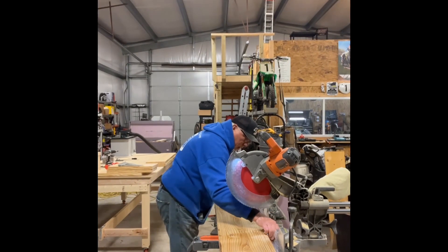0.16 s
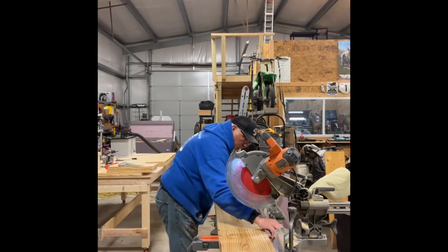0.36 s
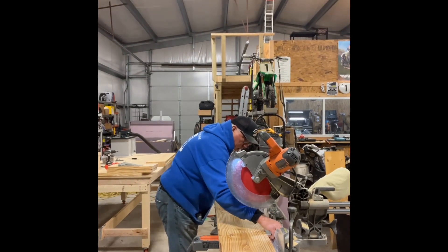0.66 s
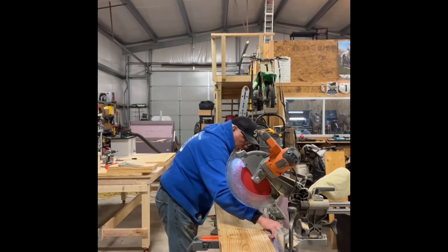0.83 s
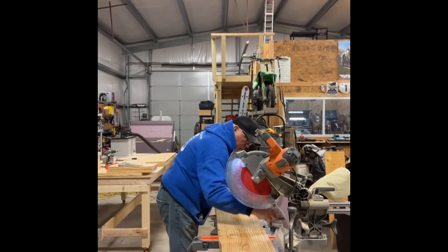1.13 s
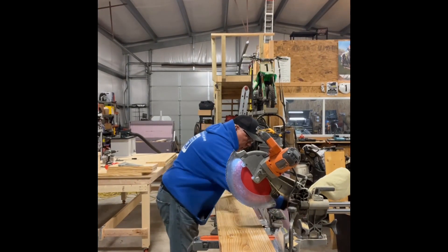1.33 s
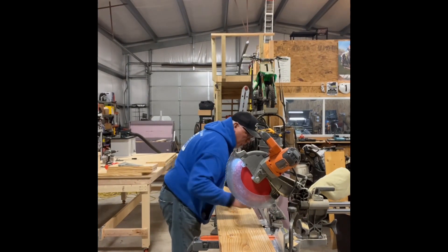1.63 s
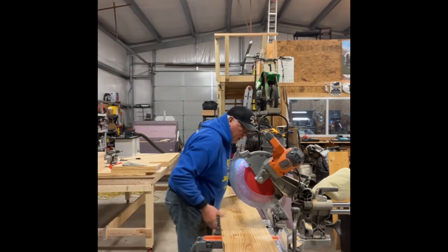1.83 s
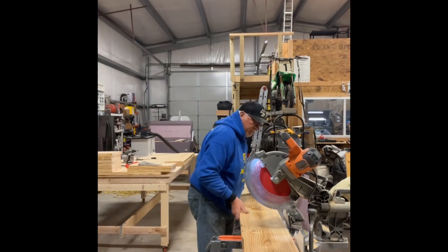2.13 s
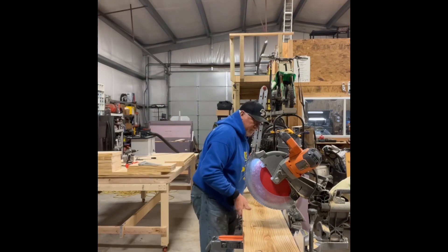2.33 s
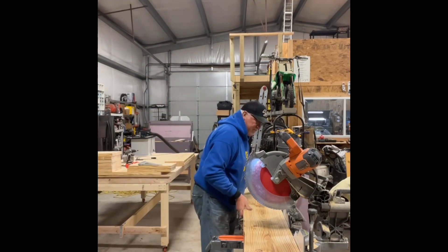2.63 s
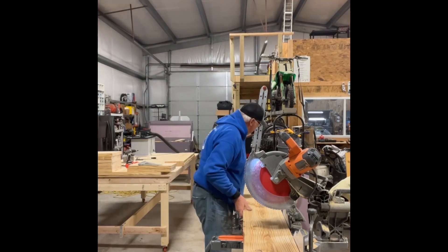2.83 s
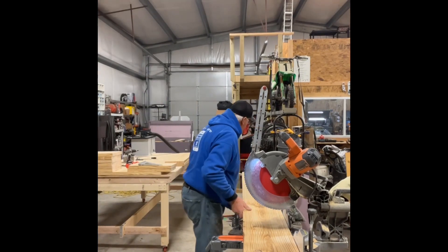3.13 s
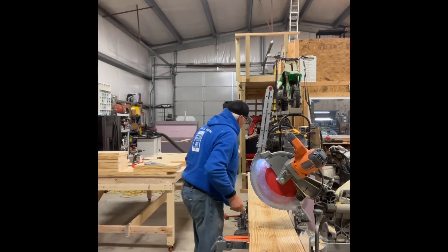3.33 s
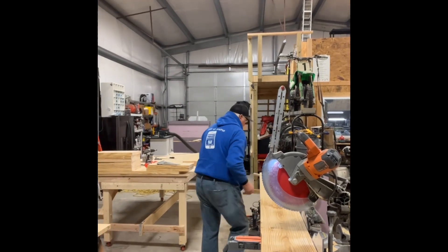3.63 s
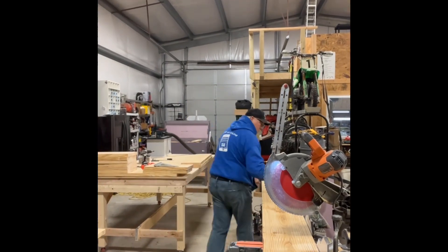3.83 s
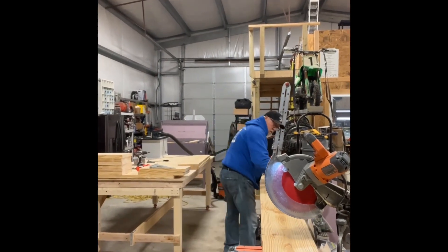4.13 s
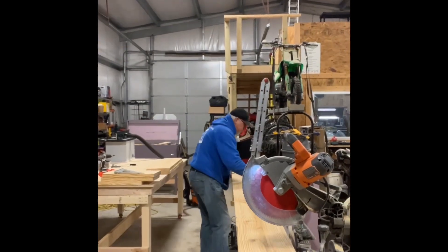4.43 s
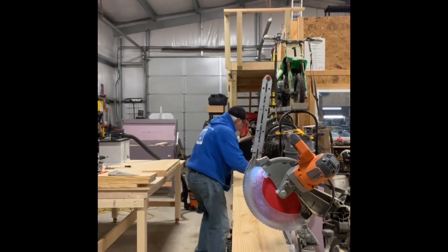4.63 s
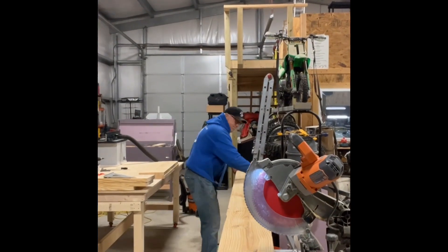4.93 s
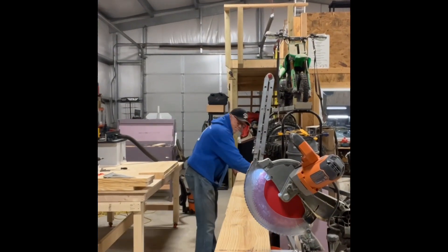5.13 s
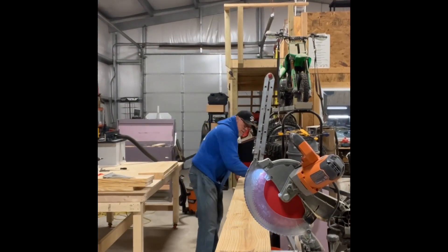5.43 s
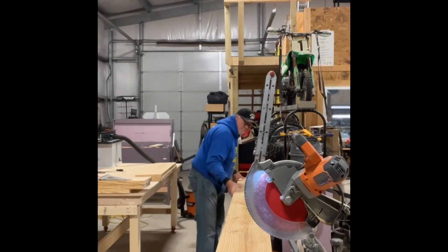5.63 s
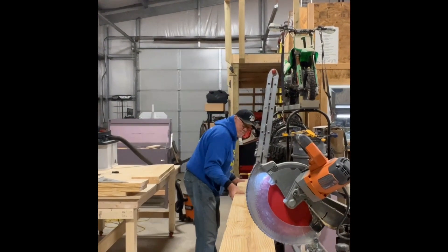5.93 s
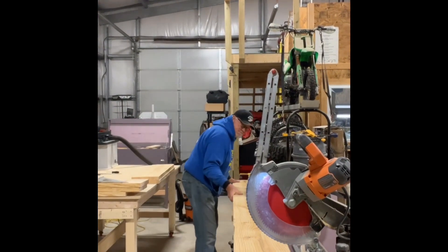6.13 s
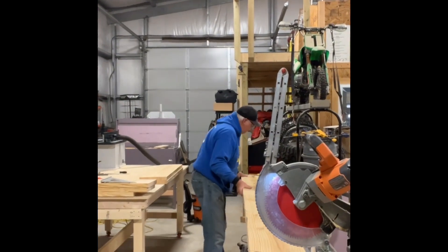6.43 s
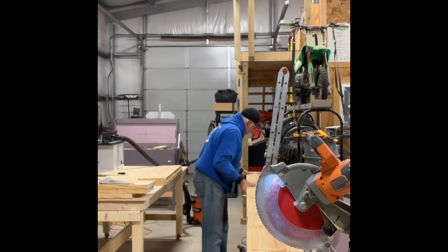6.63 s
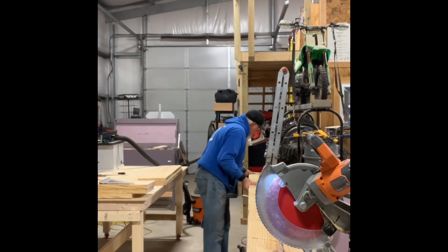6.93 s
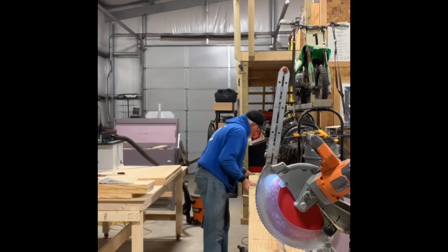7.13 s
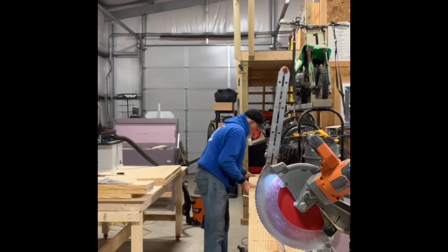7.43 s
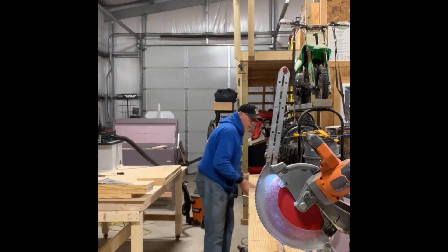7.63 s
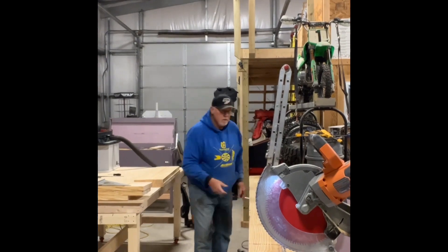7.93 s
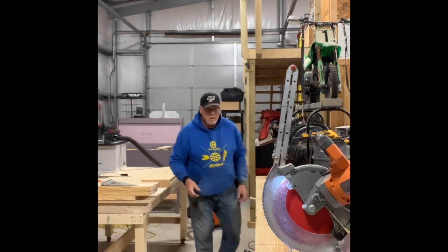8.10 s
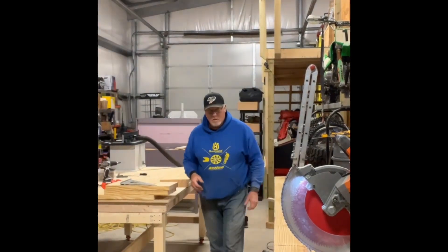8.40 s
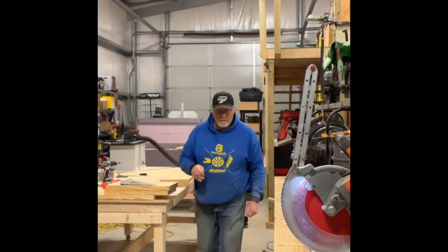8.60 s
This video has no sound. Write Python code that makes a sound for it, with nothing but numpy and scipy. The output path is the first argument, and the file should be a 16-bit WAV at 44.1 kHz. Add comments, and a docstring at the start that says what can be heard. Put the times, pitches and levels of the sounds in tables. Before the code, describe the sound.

A long wooden board is knocked, shoved and slid along a bench in a workshop, over a faint fan hum.

```python
"""Wooden board on a saw bench

A long board is knocked about in a large workshop, each blow a snap that sets the wood ringing.
Shoved along, it sticks and slips in a judder; it slides on grit with a thin squeal and bumps home.
A few faint low thuds sound like footsteps. Sleeves rustle, small things tick under the fingers,
and a distant fan hums in the air of the hall."""
import sys
import numpy as np
from scipy import signal
from scipy.fft import rfft, irfft, next_fast_len
from scipy.io import wavfile
from scipy.ndimage import uniform_filter1d

SR = 44100
rng = np.random.default_rng(int(sys.argv[2]) if len(sys.argv) > 2 else 0)


def wav_out(sig):
    """Save sig, one row per channel (or a flat mono array), as 16-bit PCM at SR to the path in sys.argv[1]."""
    wavfile.write(sys.argv[1], SR, np.round(np.clip(np.atleast_2d(sig).T, -1, 1) * 32767).astype(np.int16))


N = 386316
TIME = np.arange(N) / SR
MIDDLE_HZ = 1370  # the board's middle contact pitch


def knocks(level_db=-3.5, ring_db=-5.5, snap_s=0.0013, free_ring_s=0.26, bench_hz=132.2, bench_s=0.087):
    """Each hit is a snap, a burst of short-lived modes and a wooden ring, coloured by the contact."""
    # wooden knocks, and a few faint low thuds like footsteps: start_s, level_db,
    # hardness_db (treble over middle), pitch_hz, t60_s, rise_s (time to full contact),
    # hollow_db (how far the contact pitch stands out)
    hits = [(1.5136, -25, -3, 2160, 0.078, 0.00014, -1.5), (1.57, -34, 5, 2300, 0.05, 0.00025, -13),
            (1.579, -27, -7.5, 2600, 0.14, .0005, 0), (1.623, -22.5, -9, 2360, 0.079, 0.00012, -5.5),
            (1.961, -50, -2, 720, 0.14, 0.00089, -1), (2.002, -45.5, -9, 1490, .14, .0014, -11),
            (2.11, -15.5, -20.5, 1700, 0.078, 0.00024, -0.5), (2.662, -46.5, -15, 1400, 0.053, 0.0036, 8.5),
            (3.477, -62, -15.5, 754, .044, 0.00029, -3.5), (3.832, -56.5, -7.5, 965, 0.056, .002, 1),
            (3.978, -57, -12, 800, 0.14, .0026, 0), (4.028, -46.5, -11.5, 1385, 0.45, .002, -6),
            (4.183, -19.5, -5.5, 1780, 0.055, 0.0026, 14.5), (4.342, -30, -3, 1350, 0.088, .014, 0),
            (4.441, -39, -0.5, 1070, 0.099, 0.00023, -29), (4.502, -28.5, -5, 1420, 0.45, 0.0054, -24),
            (4.525, -9.5, -9, 1595, 0.16, 0.00018, -6.5), (4.769, -37.5, -12, 1380, 0.1, 0.0088, -13),
            (5.001, -35.5, 2, 1360, .06, 0.00025, -11), (5.044, -37, -1, 1690, 0.033, 0.0017, -23),
            (5.111, -45, 1, 2050, 0.046, 0.00055, -12), (5.15, -50.5, 0.5, 2470, 0.034, .0003, -8),
            (5.293, -30, -14.5, 1167, 0.15, 0.0022, -21.5), (5.495, -52.5, -8, 1163, 0.22, 0.016, -9),
            (5.934, -40, -15, 1180, 0.16, 0.0023, -7), (6.669, -15.5, -12, 1400, 0.17, 0.00062, -15),
            (6.87, -29, -16.5, 1020, 0.18, 0.0022, -9.5), (7.065, -21, -20, 1370, 0.18, 0.00071, -5.5),
            (7.073, -23.5, -27, 1050, 0.12, 0.00024, -9.5), (7.115, -35, -6.5, 1280, 0.27, 0.0017, -32),
            (7.162, -35.5, -10.5, 1320, 0.083, .0028, -1), (7.262, -38.5, -26, 1103, 0.064, 0.00097, 4.5),
            (7.421, -56.5, -12, 1262, .08, 0.0035, -3)]
    # bands of the thud, clack, crack and fizz: low_hz, high_hz
    bands = [(170, 660), (750, 3200), (3100, 7000), (7000, 16000)]
    out, t = np.zeros(N), np.arange(SR // 4) / SR
    for start_s, hit_db, hardness_db, pitch_hz, t60_s, rise_s, hollow_db in hits:
        # a lower contact thuds more; a harder hit is shorter and thuds less for its level
        thud_db = -12.5 - 10.5 * np.log2(pitch_hz / MIDDLE_HZ) - 0.21 * (hit_db + 35)
        fizz_db = -4 + 1.1 * hardness_db
        band_levels = hit_db + np.array([thud_db, 0, hardness_db, fizz_db])
        snap = 1 + np.exp(-t / snap_s)
        burst = rng.choice([-1., 1.], len(t)) * amp(-60 * t / t60_s) * snap
        ring = board_ring(t, damping=max(free_ring_s / t60_s, 1))
        wood = burst / np.linalg.norm(burst) + amp(ring_db) * ring
        wood *= 1 - np.exp(-t / rise_s)  # a flat face lands gradually
        contact = filtered(wood, 2, pitch_hz * np.exp([-.315, .315]), "band")
        clack = unit(wood) + amp(hollow_db) * unit(contact)
        clack = filtered(clack, 2, 0.23 * pitch_hz, "high")  # a small contact misses the low modes
        fizz = filtered(wood, 1, 7000, "low")  # wood soaks up the top treble
        thud = filtered(wood, 1, 300, "high")  # a narrow board radiates little bass
        for band, band_db, drive in zip(bands, band_levels, (thud, clack, wood, fizz)):
            layer = filtered(drive, 4, band, "band")
            attack_rms = np.std(layer[:SR // 40])
            add(out, start_s, amp(band_db + level_db) * layer / attack_rms)
        # the bench takes the weight with one low note and a dull push
        bench = np.sin(2 * np.pi * bench_hz * t) * np.exp(-t / bench_s) * (1 - np.exp(-t * bench_hz))
        push = unit(filtered(burst, 2, 70, "low"))
        add(out, start_s, amp(hit_db + thud_db - 22) * bench + amp(hit_db - 64.5) * push)
    return out


def board_ring(t, damping=1.):
    """The board rings; each point of contact favours other modes, and a firm hold damps them."""
    # modes of the board on its bench: pitch_hz, level_db, t60_s
    modes = [(226, -16, 0.058), (255, -14, 0.19), (377, -9.5, 0.13), (466, -6, 0.076), (630, -4, 0.11),
             (708, -3, 0.077), (794.5, -3, 0.18), (977, -1.5, .16), (1141.8, 1, 0.1), (1210, -7.5, 0.011),
             (1254, -5.5, 0.21), (1456, -4.5, 0.084), (1539, -1.5, 0.11), (1694, -1, 0.03),
             (1790, -0.5, 0.094), (1997, -5, 0.16), (2123, 2, 0.049), (2330, -12, 0.16), (2560, -5.5, 0.3),
             (2747, -7, .13), (3057, -10, 0.12), (4174, -10.5, .08), (4920, -10, 0.08), (5100, -1.5, 0.21),
             (5470, -4, 0.11)]
    hz, db, t60_s = np.transpose(modes)[:, :, None]
    favour_db, phase = rng.uniform(-2, 2, hz.shape), rng.random(hz.shape)
    envelopes = amp(db + favour_db - 60 * t * damping / t60_s)
    ring = (envelopes * np.sin(2 * np.pi * (hz * t + phase))).sum(0)
    return ring / np.linalg.norm(ring)


def through_board(force, ring_db):
    """Contact forces heard directly and through the ringing wood."""
    return force + amp(ring_db) * signal.oaconvolve(force, board_ring(np.arange(SR // 4) / SR))[:N]


def judder(level_db=-3.0, uneven_db=2.5, scrape_db=1.5, rasp_db=-4.5):
    """The board sticks and slips: a train of sharp, rasping jolts, each trailing a little scrape."""
    # the hard shove: time_s, slip_rate_hz, level_db
    shove = [(4.09, 230, -39), (4.104, 230, -20), (4.13, 215.5, -14), (4.15, 209.5, -18.5),
             (4.18, 205.8, -12), (4.2, 229, -28), (4.25, 225.5, -35.5)]
    # tone colour of the slips: frequency_hz, level_db
    slip_eq = [(60, -35.5), (140, -11.5), (215, 1.5), (450, -8), (800, -6.5), (1300, 1), (2100, 0),
               (3400, -3.5), (5200, 1), (6800, -9), (9000, -7), (15000, -12.5)]
    rate_hz, db = curves(shove)
    cycles = np.cumsum(rate_hz * (1 + .008 * wander(200))) / SR
    slips = np.diff(np.floor(cycles), prepend=0) * amp(uneven_db * wander(270))
    t = np.arange(SR // 250) / SR
    # bending waves carry the treble ahead of the bass
    bending_wave = signal.chirp(t, 16000, t[-1], 300, "logarithmic") * np.exp(-2 * t / t[-1])
    slips = unit(signal.oaconvolve(slips, bending_wave)[:N])
    scrape = filtered(rng.standard_normal(N) * np.exp(-(cycles % 1) / .4), 2, 2800, "high")
    force = slips + amp(scrape_db) * unit(mottle(scrape))
    wood = colour(through_board(force, ring_db=-8.5), slip_eq)
    rasp = unit(resonate(wood, hz=1900, width_hz=700))
    return amp(db + level_db) * gate(shove) * unit(wood + amp(rasp_db) * rasp)


def slides(rub_trim_db=-2.0, grit_trim_db=-4.5, chatter_db=1.5, groan_even_db=-38.0):
    """Fibres and grit catch under the moving board; it rings, and groans more the harder it rubs."""
    # tone colours of rubbing wood and of grit: frequency_hz, level_db
    rub_eq = [(60, -38), (150, -8.5), (400, -10), (700, -6), (920, -5.5), (1150, -3.5), (1800, -2.5),
              (2600, -6.5), (3600, -20), (8000, -37.5)]
    grit_eq = [(500, -42), (2000, -19.5), (3200, 1.5), (5000, 1.5), (7000, 0), (11000, -1), (16000, -7)]
    rub_db, grit_db, groan_hz = pushes()
    catches = grains(per_s=5000, spread_db=1.5) * amp(chatter_db * wander(86))
    wood = colour(through_board(catches, ring_db=-5.5), rub_eq)
    groan = resonate(resonate(wood, groan_hz, 280), groan_hz, 600)
    groan /= np.sqrt(uniform_filter1d(groan ** 2, size=SR // 20) + 1e-12)  # as strong at every pitch
    groan_share = amp(np.clip(.7 * (rub_db - groan_even_db), -6, 6))
    rub = (wood + groan_share * groan) / np.hypot(1, groan_share)
    grit = colour(mottle(catches), grit_eq)
    return amp(rub_db + rub_trim_db) * rub + amp(grit_db + grit_trim_db) * grit


def pushes(rub_power=.9, grit_power=1.6):
    """Rub and grit levels grow with the board's speed; the louder push leads the groan's pitch."""
    # pushes along the bench: start_s, rise_s, fall_s, rub_db, grit_db, groan_from_hz, groan_to_hz
    moves = [(1.991, 0.22, 0.19, -42, -49, 1835, 1414), (2.33, 0.048, 0.15, -51, -62, 690, 417),
             (4.17, 0.081, 0.096, -45, -54, 1700, 1080), (4.29, 0.15, 0.14, -40, -34.5, 1390, 930),
             (4.772, 0.23, 0.036, -34, -37.5, 1000, 1210), (4.95, 0.052, 0.19, -52.5, -37.5, 1230, 1150),
             (5.919, 0.17, 0.13, -48, -45.5, 1300, 1410), (6.17, 0.1, 0.18, -46, -46.5, 1200, 1480),
             (6.40, 0.069, 0.35, -50, -47.5, 1390, 1070)]
    rub, grit, weighted_hz = np.full(N, 1e-9), np.zeros(N), np.full(N, 1e-9 * MIDDLE_HZ)
    for start_s, rise_s, fall_s, rub_db, grit_db, from_hz, to_hz in moves:
        speed = swell(start_s, rise_s, fall_s)
        rubbing = amp(rub_db) * speed ** rub_power
        rub += rubbing
        grit += amp(grit_db) * speed ** grit_power
        weighted_hz += rubbing * np.interp(TIME, [start_s, start_s + rise_s + fall_s], [from_hz, to_hz])
    return 20 * np.log10(rub), 20 * np.log10(grit + 1e-9), weighted_hz / rub


def squeal(level_db=-0.5, overtone_db_per_octave=-11.5, rasp_db=-11.5):
    """Fine ridges zip over an edge: a broken, raspy tone that glides up and back down."""
    # the last slide's squeal, rising and sinking with the board's speed: time_s, pitch_hz, level_db
    glide = [(5.99, 1150, -69), (6.06, 1472, -54.5), (6.19, 1910, -70.5), (6.3, 2265, -48.5),
             (6.44, 2437, -49.5), (6.485, 2220, -43), (6.545, 1580, -42), (6.6, 903, -61)]
    hz, db = curves(glide)
    jitter = 1 + .017 * wander(1100) + .009 * wander(60)
    phase = 2 * np.pi * np.cumsum(hz * jitter) / SR
    tone = np.zeros(N)
    for harmonic in (1, 2, 3):
        rasp = 1 + amp(rasp_db) * wander(900)
        tone += amp(overtone_db_per_octave * np.log2(harmonic)) * np.sin(harmonic * phase) * rasp
    flutter_db = 3 * wander(320) + 3.2 * wander(70)
    return amp(db + level_db + flutter_db) * gate(glide) * unit(tone)


def ticks(level_db=-12.0, rise_s=0.0011, decay_s=0.0074, body_db=11.5):
    """Short dry clicks, duller or brighter, each with a small resonant body."""
    # small things under the fingers: start_s, level_db, brightness_db, pitch_hz
    touches = [(0.0176, -39, -3, 1500), (0.1626, -50.5, 16, 2860), (0.183, -37, -3, 2360),
               (0.2808, -39, -18, 2830), (0.384, -40.5, -4, 2640), (0.404, -38, -20, 2540),
               (0.4267, -44, -20, 2530), (0.518, -33.5, -14, 2660), (0.528, -35, -16, 3170),
               (0.607, -38, -27, 1370), (0.919, -26, -4, 2790), (0.9867, -32.5, -3, 1390),
               (1.886, -42, 7.5, 2520), (3.28, -53.5, 21.5, 3040), (3.8076, -40.5, -6, 2880),
               (8.4834, -39.5, 7, 3900)]
    out, t = np.zeros(N), np.arange(SR // 25) / SR
    for start_s, db, brightness_db, pitch_hz in touches:
        click = rng.standard_normal(len(t)) * np.exp(-t / decay_s) * (1 - np.exp(-t / rise_s))
        click = filtered(click, 2, 1100, "high")
        dull = filtered(click, 1, 6000, "low")
        bright = amp(brightness_db) * (click - dull)
        body = amp(body_db) * resonate(click, pitch_hz, width_hz=383)
        add(out, start_s, amp(db + level_db) * (dull + body + bright))
    return out


def rustle(brush_trim_db=-5.0, sheen_trim_db=-6.0, uneven_db=4.5, rise_share=0.47):
    """Cloth and skin brush in fine dense grains, each stroke swelling and fading unevenly."""
    # strokes of sleeves and hands: start_s, length_s, brush_db, sheen_db
    strokes = [(0, 0.036, -55, -63), (0.15, .11, -63, -70), (0.27, 0.21, -77, -66), (0.48, 0.096, -57, -61),
               (0.77, 0.28, -67.5, -78), (2.42, 0.4, -71.5, -55.5), (2.949, 0.068, -54, -40.5),
               (3.041, 0.06, -58, -44), (3.178, 0.065, -51.5, -53.5), (3.406, 0.12, -67, -56),
               (3.502, 0.076, -65, -55.5), (3.61, 0.073, -73.5, -60.5), (3.786, 0.25, -67.5, -61.5),
               (5.486, 0.18, -58, -62.5), (5.636, 0.34, -72, -69.5), (7.358, 0.12, -63, -61),
               (7.555, 0.35, -64, -56.5), (8.06, 0.094, -71.5, -56.5), (8.189, 0.22, -60, -64),
               (8.499, 0.65, -75.5, -69)]
    # tone colours of the soft brush and its high sheen: frequency_hz, level_db
    brush_eq = [(300, -33), (900, -3), (1600, 0), (2700, -0.5), (5500, -9), (8000, -14.5), (16000, -29)]
    sheen_eq = [(1000, -43), (4000, -5.5), (6500, -6.5), (10000, -2.5), (16000, -8)]
    brush_gain, sheen_gain = np.full(N, amp(-78)), np.full(N, amp(-77.5))  # cloth never lies quite still
    for start_s, length_s, brush_db, sheen_db in strokes:
        stroke = swell(start_s, length_s * rise_share, length_s * (1 - rise_share)) ** 1.03
        brush_gain += amp(brush_db) * stroke
        sheen_gain += amp(sheen_db) * stroke
    threads = colour(mottle(grains(per_s=6000, spread_db=1.6)), brush_eq)
    fuzz = colour(mottle(grains(per_s=9000, spread_db=1.6)), sheen_eq)
    cloth = amp(brush_trim_db) * brush_gain * threads + amp(sheen_trim_db) * sheen_gain * fuzz
    return amp(uneven_db * wander(35)) * cloth


def hall(send, build_s=0.011):
    """Scattered echoes build up quickly, each band dying at its own speed."""
    # decay of the hall: frequency_hz, t60_s
    decay_times = [(150, 0.33), (500, 0.36), (1500, 0.26), (4000, 0.4), (8000, .45), (16000, 0.46)]
    echoes = rng.standard_normal(SR) * (rng.random(SR) < .15)
    hz, t, bands = signal.stft(echoes, SR, nperseg=256)
    bands = bands * amp(-60 * t / value_at(decay_times, hz)[:, None]) * (1 - np.exp(-t / build_s))
    tail = signal.istft(bands, SR, nperseg=256)[1]
    return signal.fftconvolve(send, tail / np.linalg.norm(tail))[:N]


def fan(hum_hz=177.5, waver_hz=0.41, air_swell_db=1.4, hum_swell_db=1.2):
    """A distant fan: a wavering hum in soft moving air."""
    # level rides of the hum and the air: time_s, level_db
    hum_ride = [(0, -69.5), (1.1, -70), (1.45, -61), (2.45, -62.5), (2.95, -87.5), (4.4, -61), (5.7, -69),
                (7.1, -62.5), (8.76, -72)]
    air_ride = [(0, -69.5), (1.6, -66), (2.9, -68.5), (4.5, -65), (7.0, -67.5), (8.76, -66)]
    # tone colour of the air: frequency_hz, level_db
    air_eq = [(15, -61.5), (25, -37.5), (43, -33), (102, -1), (161, 0.5), (293, -5.5), (439, -11.5),
              (575, -6), (641, -10.5), (1100, -11), (1440, -9.5), (2350, -13), (3340, -26), (12900, -33.5),
              (16000, -29.5)]
    hum_db, air_db = curves(hum_ride)[0], curves(air_ride)[0]
    hum = unit(np.sin(2 * np.pi * np.cumsum(hum_hz + waver_hz * wander(5.5)) / SR))
    air = colour(rng.standard_normal(N), air_eq) * amp(air_swell_db * wander(3))
    return amp(hum_db + hum_swell_db * wander(9.8)) * hum + amp(air_db) * air


def faint_hisses(width_hz=150.0):
    """Noise in narrow resonances, swelling and fading."""
    # hisses in the hall: start_s, length_s, pitch_hz, level_db
    hisses = [(-.3, 1.6, 2600, -78), (-.1, 1.3, 835, -70.5), (7.799, 0.8, 2414, -72)]
    out = np.zeros(N)
    for start_s, length_s, hz, db in hisses:
        band = resonate(resonate(rng.standard_normal(N), hz, width_hz), hz, 2 * width_hz)
        out += amp(db) * swell(start_s, length_s / 2, length_s / 2) * unit(band)
    return out


def grains(per_s, spread_db):
    """Tiny catches of uneven size at random moments."""
    catches = (rng.random(N) < per_s / SR) * rng.standard_normal(N)
    return catches * amp(spread_db * np.minimum(rng.exponential(1, N), 4))


def mottle(x, depth_db=3):
    """The colour of a rubbing sound shifts in patches as the contact moves."""
    bands = signal.stft(x, SR, nperseg=512)[2]
    patches = unit(uniform_filter1d(uniform_filter1d(rng.standard_normal(bands.shape), 7, 0), 7, 1))
    return signal.istft(bands * amp(depth_db * patches), SR, nperseg=512)[1][:N]


def resonate(x, hz, width_hz):
    """A resonance of gain 1 that follows hz, a number or a curve."""
    carrier = np.exp(2j * np.pi * np.cumsum(hz * np.ones(len(x))) / SR)
    pole = np.exp(-np.pi * width_hz / SR)
    return 2 * (carrier * signal.lfilter([1 - pole], [1, -pole], x / carrier)).real


def filtered(x, order, hz, kind):
    """A low-, high- or band-pass filter."""
    return signal.sosfilt(signal.butter(order, hz, kind, fs=SR, output="sos"), x)


def colour(x, eq):
    """Shapes x with an EQ curve; rms 1."""
    size = next_fast_len(len(x))
    gain = amp(value_at(eq, np.fft.rfftfreq(size, 1 / SR)))
    return unit(irfft(rfft(x, size) * gain, size)[:len(x)])


def value_at(points, hz):
    """A table's value at hz, on a log frequency axis."""
    point_hz, values = np.transpose(points)
    return np.interp(np.log(hz + 1), np.log(point_hz), values)


def curves(rows):
    """Each column after the first as a curve in time."""
    time_s, *columns = np.transpose(rows)
    return [np.interp(TIME, time_s, column) for column in columns]


def gate(rows):
    """A soft gate, open over the time span of a table."""
    return uniform_filter1d(1. * (TIME > rows[0][0]) * (TIME < rows[-1][0]), size=200)


def swell(start_s, rise_s, fall_s):
    """A rounded rise to 1 and fall to 0, like a hand's speed from rest to rest."""
    ramp = np.interp(TIME, start_s + np.cumsum([0, rise_s, fall_s]), [0, 1, 0])
    return np.sin(np.pi / 2 * ramp)


def wander(per_s):
    """Random drift through per_s points a second; rms 1."""
    return unit(np.interp(TIME * per_s, np.arange(N // 10), rng.standard_normal(N // 10)))


def add(mix, start_s, sound):
    """Mixes a sound in at start_s."""
    part = mix[round(start_s * SR):][:len(sound)]
    part += sound[:len(part)]


def amp(db):
    """Decibels to gain."""
    return 10 ** (np.asarray(db) / 20)


def unit(x):
    """Scales to rms 1."""
    return x / np.sqrt(np.mean(x ** 2) + 1e-20)


def scene(impact_send_db=-8., friction_send_db=-5.5):
    """Impacts and friction echo in the hall, over the fan and faint hisses; mono."""
    impacts = knocks() + ticks()
    friction = slides() + judder() + squeal() + rustle()
    reverb = hall(amp(impact_send_db) * impacts + amp(friction_send_db) * friction)
    return (impacts + friction + reverb + fan() + faint_hisses())[None]


def record(dry, ceiling=0.9, cutoff_hz=15950):
    """Soft clipping rounds the hardest peaks; a steep low-pass trims the top."""
    rounded = dry / (1 + (dry / ceiling) ** 6) ** (1 / 6)
    low_pass = signal.firwin(401, cutoff_hz, window=("kaiser", 8), fs=SR)
    return signal.oaconvolve(rounded, low_pass[None], "same")


dry = scene()
out = record(dry)
wav_out(out)
```